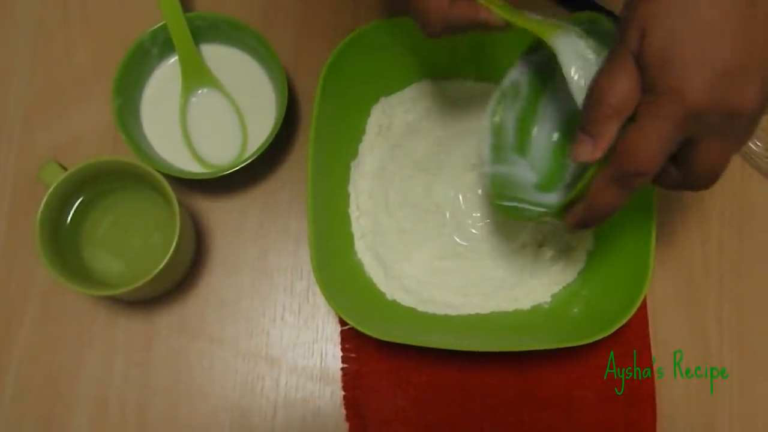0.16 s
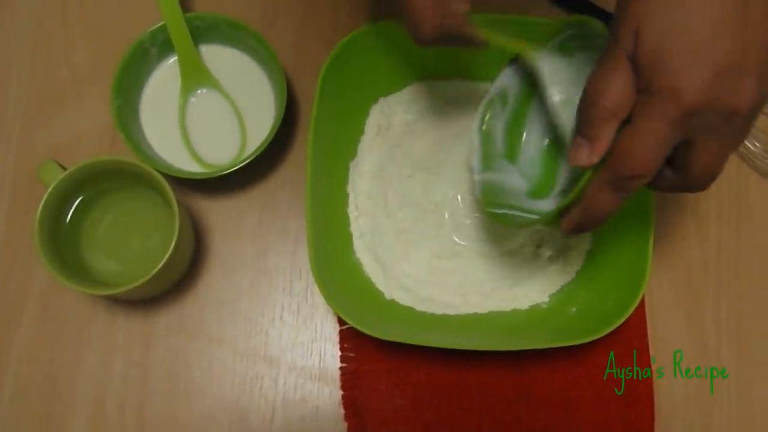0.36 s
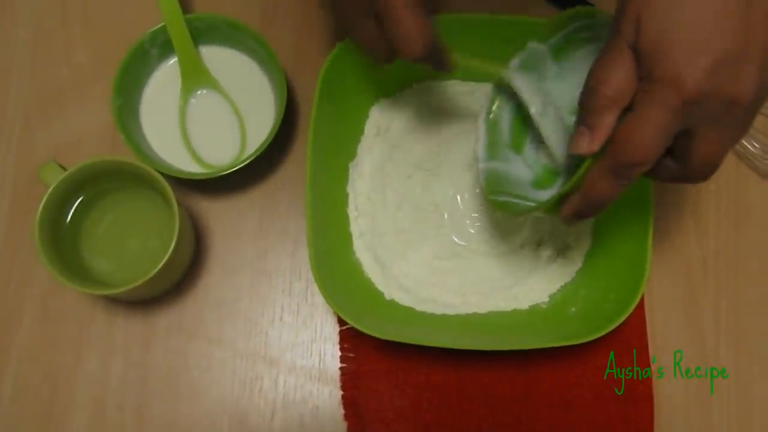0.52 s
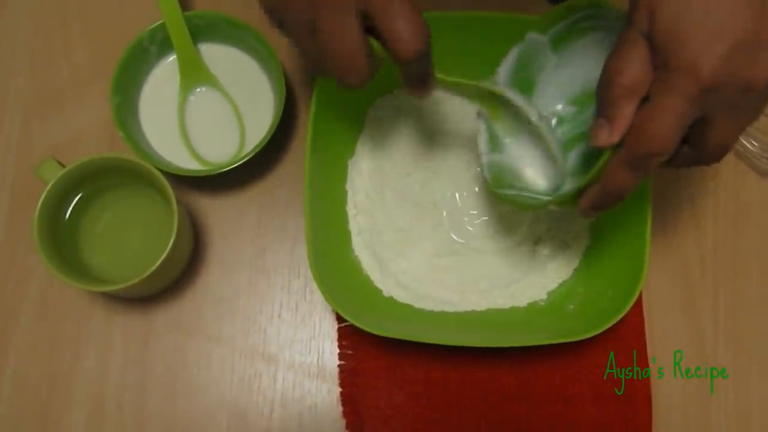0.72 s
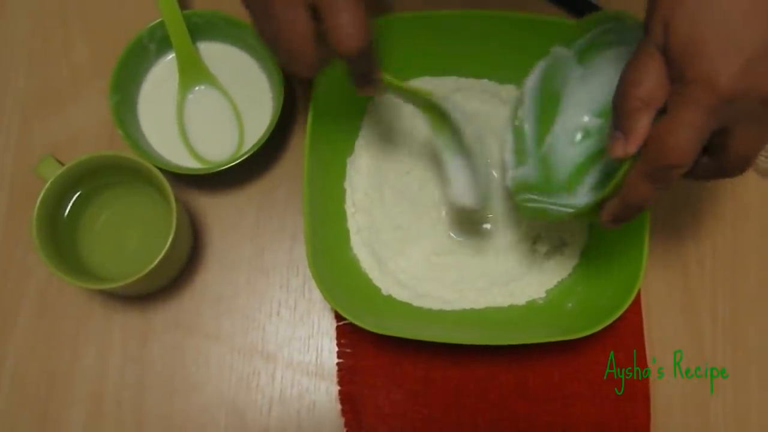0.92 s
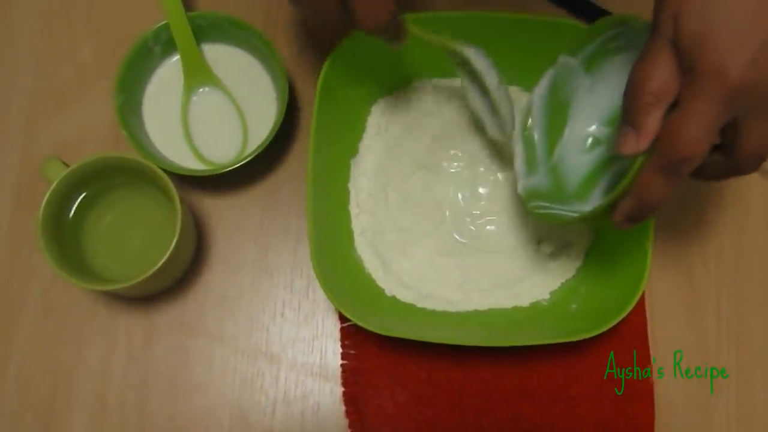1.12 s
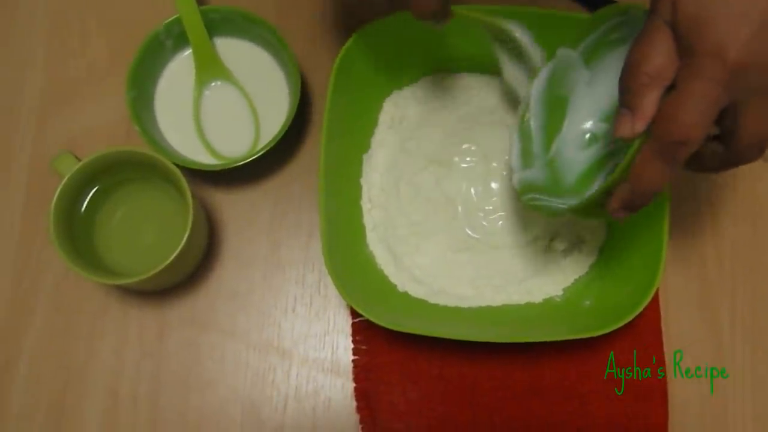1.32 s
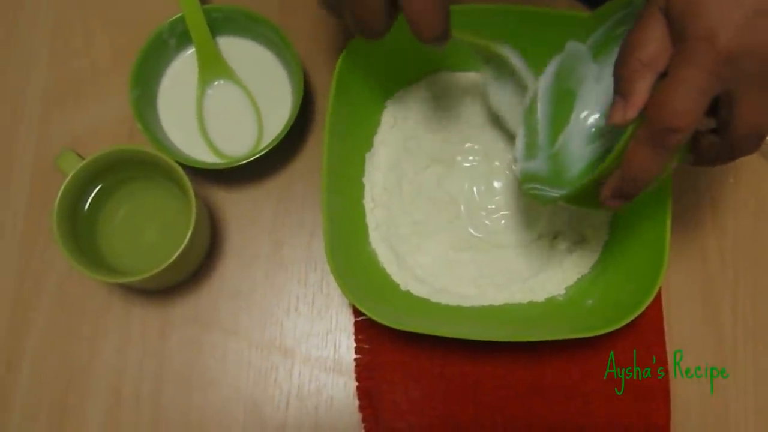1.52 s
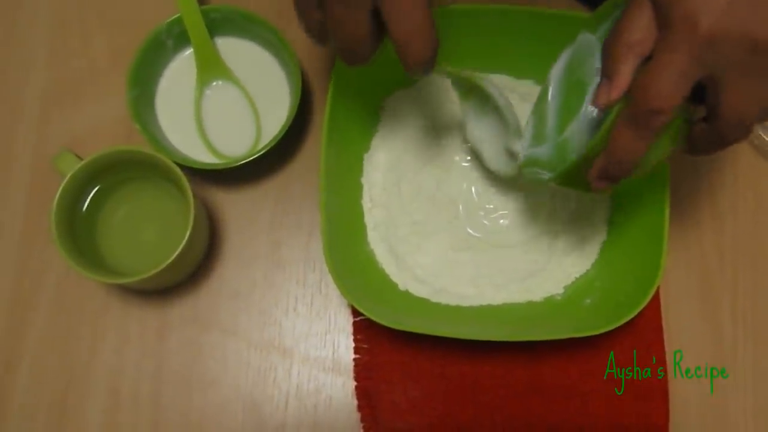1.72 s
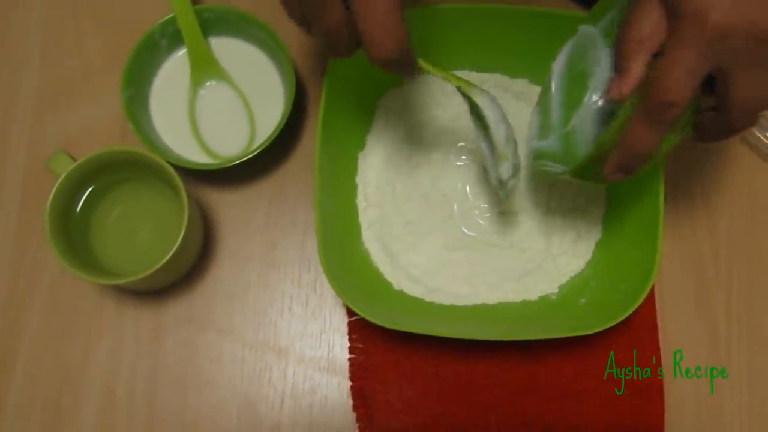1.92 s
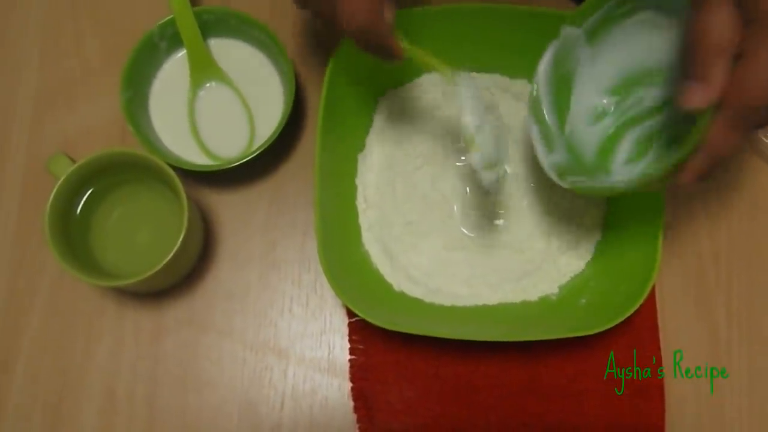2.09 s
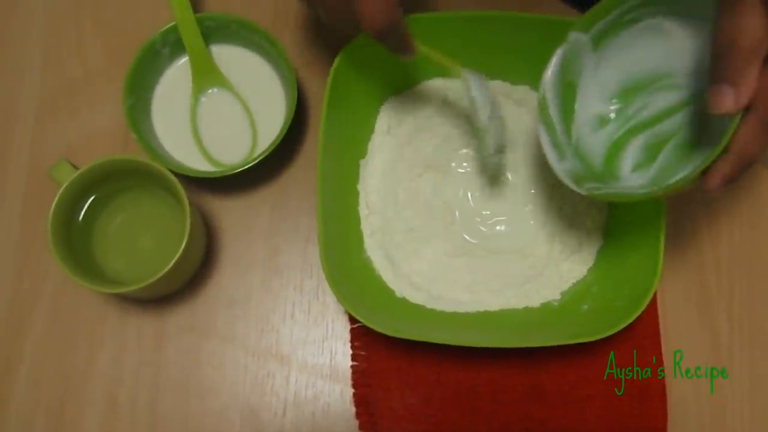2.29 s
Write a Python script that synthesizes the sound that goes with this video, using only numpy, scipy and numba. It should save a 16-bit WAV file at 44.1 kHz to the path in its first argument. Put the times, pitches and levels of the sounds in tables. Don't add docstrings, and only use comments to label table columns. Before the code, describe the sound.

A plastic spoon strikes a small hand-held plastic bowl: a hard, bright clack at 0.2 seconds, a slightly weaker one at 0.4, each with a brief shiver. Dull table thuds follow at 0.5-0.6, small wet plops around 0.84 and 1.15. A soft tap at 1.3 leads into two rough scrapes until 1.7, then a plop at 1.8. Close kitchen; faint motor chatter, thin whine, rumble and hiss throughout.

```python
import sys
import numpy as np
from scipy import signal
from scipy.fft import rfft, irfft
from scipy.io import wavfile
from scipy.ndimage import uniform_filter1d
from numba import njit

SR = 44100
rng = np.random.default_rng(int(sys.argv[2]) if len(sys.argv) > 2 else 0)


def dump_mix(stems):
    frames = np.atleast_2d(stems).T
    limited = np.clip(frames, -1, 1)
    pcm = np.round(limited * 32767).astype(np.int16)
    wavfile.write(sys.argv[1], SR, pcm)


def decibels_to_gain(level_db):
    exponent = np.asarray(level_db, float) / 20
    return 10 ** exponent


N = 103635
T = np.arange(N) / SR
RING = np.arange(SR // 4) / SR

# [f/Hz, density/dB]
HISS = [(100, -3.5), (300, -11), (700, -13.5), (1500, -23), (3200, -20.5), (6500, -20), (11000, -18),
        (16000, -19)]
# [f/Hz, density/dB]
RUMBLE = [(5, 0), (15, 4.5), (32, -4), (45, -9), (62, -7), (90, -39), (150, -25.5), (250, -47)]
HISS_DB, RUMBLE_DB = -47.5, -40.5

# [t/s, level/dB]
TABLE_PUSH = [
    (.44, -67),
    (.5, -40),
    (.55, -39.5),
    (.61, -42),
    (.65, -50.5),
    (.72, -46.5),
    (.84, -47),
    (.9, -65),
]
# [f/Hz, width/Hz, level/dB]
TABLE_MODES = [(48.5, 9.1, 11.5), (156, 34, -1.5), (202, 31, -8), (339, 85, -9.5)]
# [t/s, level/dB, f/Hz, t60/s, rise/s]
THUDS = [
    (.49, -35, 151.2, 0.12, 0.0071),
    (.598, -34, 142.5, 0.19, 0.011),
    (.6, -41.5, 187.6, 0.32, 0.019),
]

# [f/Hz, width/Hz, level/dB]
CASE = [(945, 128, -6), (1532, 210, -6.5), (2085, 160, -2), (2578, 131, -1), (3908, 196, -3.5),
        (4670, 590, -12.5), (5540, 320, -13), (8110, 1500, -16.5)]
# [t/s, level/dB]
MOTOR = [(0, 2.5), (.2, 2), (.55, 2.5), (.62, 0.5), (.75, 2.5), (.9, 5), (1.05, 0), (1.2, 1.5), (1.5, 1),
         (1.8, 3.5), (1.95, 1), (2.19, 3), (2.23, -3), (2.27, 2), (2.35, 0.5)]
CHATTER_PER_S, CHATTER_JITTER, CHATTER_SPREAD_DB = 88, 0.35, 1
CHATTER_DB, GRIND_DB = -53, -48
# [shaft multiple, level/dB]
SIDEBANDS = [(-2, -19), (-1, -13), (0, 0), (1, -6), (2, -12), (4, -19)]
WHINE_HZ, WHINE_DB, SHAFT_HZ, WANDER_HZ = 11361.7, -56.5, 29.8, 3.5
# [t/s, peak/dB]
TICKS = [(0.0272, -32), (0.0857, -29), (0.1244, -28), (0.5282, -42), (0.6293, -30.5), (0.7063, -30),
         (0.7485, -35), (0.7718, -32), (0.7934, -25), (0.839, -28.5), (0.866, -31), (0.9068, -31),
         (0.9698, -28), (0.9822, -26), (1.0156, -28), (1.04, -34), (1.1212, -34), (1.146, -26),
         (1.1534, -39), (1.1815, -29), (1.1927, -40), (1.243, -29), (1.745, -31), (1.8271, -29),
         (1.8564, -27), (1.9175, -27), (1.94, -30.5), (1.976, -36), (2.0013, -32), (2.04, -32),
         (2.0805, -33), (2.102, -33.5), (2.1728, -26), (2.2573, -32), (2.2842, -28), (2.3032, -29)]
TICKS_DB = -55.5

# [t/s, level/dB, f/Hz, t60/s, rise/s]
PLOPS = [(0.25, -36, 2230, 0.02, .002), (1.15, -24.5, 3200, 0.029, 0.0064), (.706, -34, 2000, 0.017, .002),
         (0.48, -36, 1580, 0.019, .001), (1.2, -33, 2650, 0.022, 0.0066), (.838, -36, 7900, .012, .001),
         (.822, -40, 8700, 0.011, 0.00091), (.822, -39, 10300, .008, .001), (.845, -44, 12300, .008, .001),
         (.8375, -33, 950, .02, .002), (.8425, -21, 1000, .02, .004), (.84, -42, 10700, .008, .001),
         (1.7960, -27.5, 1400, .015, .0006), (2, -36, 2500, 0.0076, 0.00023),
         (1.799, -33, 840, 0.023, .001), (1.796, -32, 1730, .012, .0006), (1.9, -43, 2100, 0.0083, .001),
         (1.2, -31, 5500, .0012, 0.000047), (0.74, -33, 3500, 0.0035, .0001), (1.92, -38, 203, 0.042, .01)]
PLOP_ROOM_DB = -12

# [t/s, pressure/dB, treble from speed/dB]
SLIDE = [
    (.3, -62, 17),
    (.35, -54.5, 15),
    (.38, -52.5, 18),
    (.398, -52, 16),
    (.405, -70, 0),
]
STROKE_1 = [
    (1.325, -37.5, -7),
    (1.35, -45, -4),
    (1.378, -43, 2),
    (1.386, -34, -7),
    (1.435, -35, 0.5),
    (1.46, -36, -1),
    (1.472, -39, -8),
    (1.49, -44, -3),
    (1.532, -44, 2.5),
]
STROKE_2 = [
    (1.53, -55, 15),
    (1.56, -40.5, 4.5),
    (1.59, -32.5, 0),
    (1.63, -33, 5.5),
    (1.665, -31.5, -1),
    (1.698, -35.5, -2),
    (1.708, -53, -3),
    (1.8, -41, -10),
    (1.84, -68, -13),
]
# [f/Hz, width/Hz, level/dB]
WALL_1 = [(390, 77, -10.5), (698, 84, -7.5), (945, 157, -6), (1503, 83, 0.5), (2650, 290, -13.5),
          (3810, 330, -15.5), (5360, 380, -14.5), (6870, 630, -17), (8140, 420, -14.5), (10100, 2900, -31)]
WALL_2 = [(378, 67, -12), (591, 104, -5.5), (833, 88, 2), (1147, 67, 2), (1370, 164, -2.5), (1780, 430, -6),
          (2475, 63, -6), (3620, 610, -12), (5520, 1200, -17), (7160, 320, -15.5), (8090, 230, -12.5),
          (9900, 2000, -21.5), (12700, 2000, -26.5)]
# [t/s, f/Hz]
HOLLOW = [
    (1.55, 1750),
    (1.6, 1560),
    (1.635, 1450),
    (1.665, 1300),
    (1.7, 1150),
]
HOLLOW_WIDTH_HZ, HOLLOW_DB = 265.0, -1
SLIPS_PER_S, SLIP_SPREAD_DB = 3500, 2.5
TREBLE_HZ = 2250

# [t/s, peak/dB, bounce delay/s, bounce/dB, crack/dB]
TAPS = [
    (.2171, -3.5, 0.00084, -40, -14),
    (.4000, -7.5, 0.00075, -35, -14),
    (1.3122, -17, 0.00087, -25, -13.5),
]
# [f/Hz, level/dB, t60/s]
GRIP_1 = [(668, -12, 0.049), (1115, 7.5, 0.02), (1327, 5, 0.015), (1995, -15.5, 0.037), (2700, 3.5, 0.014),
          (2950, 1.5, 0.014), (4735, 7.5, 0.011), (5030, 11.5, 0.006), (6150, 3, 0.0099), (7020, -1, 0.011),
          (8740, -6, 0.009), (9530, -19, .012), (11300, -19, 0.0077)]
GRIP_2 = [(590, -11, 0.0049), (1164, -1.5, 0.016), (1660, 4, 0.0087), (1840, -7, 0.0072),
          (2817, 0.5, 0.012), (3510, -3, 0.0082), (4580, 1.5, 0.0095), (5530, -11.5, 0.017),
          (6900, -20, 0.012), (7420, -10.5, 0.012), (8320, -12.5, 0.013), (9706, -22, .01),
          (11300, -32, .006)]
GRIP_3 = [(510, -24, .015), (1050, 7.5, 0.0052), (1450, 6.5, 0.008), (1600, -23, 0.012), (2560, -7, 0.013),
          (3620, -5.5, 0.012), (4180, -2.5, 0.0081), (5370, 1, 0.0047), (6500, -5.5, 0.0092),
          (6950, -3, 0.0073), (8110, -7.5, 0.015), (9700, -9.5, 0.0096), (11900, -3, 0.0052)]
CRACK_T60_S, RUSTLE_DB, RUSTLE_T60_S = 0.016, -17, 0.13
SCATTER_RING = 0.45
# [f/Hz, width/Hz, level/dB]
SHAKE_1 = [(595, 83, 7), (1150, 320, -17), (2060, 100, -8), (2620, 190, 3), (2920, 250, 0.5),
           (3420, 130, -12), (4550, 170, -4), (5140, 400, -2), (7170, 700, -10.5)]
SHAKE_2 = [(915, 71, -5), (1700, 170, 4), (1970, 200, 1.5), (2780, 240, -1.5), (3950, 500, -10),
           (4640, 300, -6.5), (5440, 500, -11), (7000, 430, -16), (8200, 340, -10)]
SHAKE_3 = [(1010, 89, 6), (1430, 140, 4), (2520, 240, -4), (3870, 330, -9), (5470, 500, -27),
           (7000, 500, -20)]
# [level/dB, t60/s]
SHAKES = [
    (-27.5, 0.27),
    (-27, 0.25),
    (-29.5, 0.15),
]

# [f/Hz, t60/s, level/dB]
KITCHEN = [(303, 1, -26), (553, 0.54, -19.5), (1300, 0.14, -20.5), (2760, 0.59, -16), (5000, 0.42, -27),
           (9600, 0.36, -18)]
EARLY_DB, EARLY_T60_S, PREDELAY_S = 6.5, 0.07, 0.0039

KNEE, HEADROOM = 0.8, 0.17
TOP_HZ = 15720


def level(x, db):
    return x * decibels_to_gain(db) / np.sqrt(np.mean(x ** 2))


def add(out, start, x):
    i = int(start * SR)
    out[i:i + len(x)] += x


def fade(t, t60):
    return np.exp(-np.log(1000) * t / t60)


def band(x, hz, width):
    return signal.lfilter(*signal.iirpeak(hz, hz / width, SR), x)


def body(x, peaks):
    return sum((-1) ** k * decibels_to_gain(db) * band(x, f, w) for k, (f, w, db) in enumerate(peaks))


@njit
def sweep(x, hz, width):
    y, b, l = np.empty(len(x)), 0., 0.
    for i in range(len(x)):
        g, k = np.tan(np.pi * hz[i] / SR), width / hz[i]
        v = (b + g * (x[i] - l)) / (1 + g * (g + k))
        b, l, y[i] = 2 * v - b, l + 2 * g * v, k * v
    return y


def coloured(points):
    f, db = np.transpose(points)
    hz = np.fft.rfftfreq(N, 1 / SR) + 1
    gain = decibels_to_gain(np.interp(np.log(hz), np.log(f), db))
    return irfft(rfft(rng.standard_normal(N)) * gain, N)


def walk(rate):
    k = int(SR / rate)
    held = np.repeat(rng.standard_normal(N // k + 1), k)
    return 0.72 * uniform_filter1d(uniform_filter1d(held, k), k)[:N]


def curve(rows, order=1):
    r = np.array(rows)
    return decibels_to_gain(np.interp(T, r[:, 0], r[:, order], left=-120, right=-120))


def ring(hz, t60, rise, late=0.):
    t = np.maximum(RING - late, 0)
    return (1 - np.exp(-t / rise)) * fade(t, t60) * np.sin(2 * np.pi * hz * t)


def knocks(rows):
    out = np.zeros(N)
    for s, db, f, t60, rise in rows:
        add(out, s, decibels_to_gain(db + 5.0) * ring(f, t60, rise))
    return out


def floor():
    hiss = level(coloured(HISS), HISS_DB)
    return hiss + level(coloured(RUMBLE) * decibels_to_gain(0.5 * walk(5.6)), RUMBLE_DB)


def table():
    friction = rng.standard_normal(N) * decibels_to_gain(3.1 * walk(38.8))
    return level(body(friction, TABLE_MODES), 0) * curve(TABLE_PUSH) + knocks(THUDS)


def motor():
    chance = rng.standard_normal((400, 2))
    at = np.cumsum(np.exp(CHATTER_JITTER * chance[:, 0]) * SR / CHATTER_PER_S).astype(int)
    teeth = np.zeros(N)
    teeth[at[at < N]] = decibels_to_gain(CHATTER_SPREAD_DB * chance[at < N, 1])
    decay = np.exp(-1 / (0.00026 * SR))
    burst = signal.lfilter([1], [1, -decay], teeth) * rng.standard_normal(N)
    grind = rng.standard_normal(N) * decibels_to_gain(3.53 * walk(90))
    return (level(body(burst, CASE), CHATTER_DB) + level(body(grind, CASE), GRIND_DB)) * curve(MOTOR)


def whine():
    turn = np.cumsum(WHINE_HZ + WANDER_HZ * walk(13.2)) / SR
    tones = [decibels_to_gain(db) * np.sin(2 * np.pi * (turn + k * SHAFT_HZ * T) + k * k) for k, db in SIDEBANDS]
    return level(sum(tones), WHINE_DB)


def ticks():
    out, t = np.zeros(N), RING[:400]
    for s, db in TICKS:
        add(out, s, decibels_to_gain(db) * rng.standard_normal(400) * t * np.exp(-t / .001))
    return level(body(band(out, 2600, 3500), CASE), TICKS_DB)


def scrapes():
    out = np.zeros(N)
    n = SR // 2
    for wall, rows in ((WALL_1, STROKE_1), (WALL_2, STROKE_2), (WALL_2, SLIDE)):
        a = int(rows[0][0] * SR)
        sizes = decibels_to_gain(SLIP_SPREAD_DB * np.minimum(rng.exponential(size=n), 4.))
        slips = (rng.random(n) < SLIPS_PER_S / SR) * sizes * rng.choice([-1, 1], n)
        slips = slips * decibels_to_gain(1.8 * walk(150)[:n])
        low = body(slips, [p for p in wall if p[0] < TREBLE_HZ])
        if rows is STROKE_2:
            hollow_hz = np.interp(T[a:a + n], *np.array(HOLLOW).T)
            low = low + decibels_to_gain(HOLLOW_DB) * sweep(slips, hollow_hz, HOLLOW_WIDTH_HZ)
        high = body(slips, [p for p in wall if p[0] >= TREBLE_HZ])
        pressure, speed = curve(rows)[a:a + n], curve(rows, order=2)[a:a + n]
        add(out, a / SR + 1e-6, pressure * (low + speed * high) / low.std())
    return out


def shakes():
    out = np.zeros(N)
    for tap, (db, t60), peaks in zip(TAPS, SHAKES, (SHAKE_1, SHAKE_2, SHAKE_3)):
        rattle = band(rng.standard_normal(len(RING)), 2760, 5400)
        shiver = level(body(rattle, peaks), db)
        add(out, tap[0], shiver * np.minimum(RING / 0.0083, 1) * fade(RING, t60))
    return out


def taps():
    out, off = np.zeros(N), np.zeros(N)
    for (s, db, lag, bounce_db, crack_db), modes in zip(TAPS, (GRIP_1, GRIP_2, GRIP_3)):
        blow = sum(decibels_to_gain(g) * ring(f, t60, 0.00061) for f, g, t60 in modes)
        bounce = sum(decibels_to_gain(g) * ring(f, t60, 0.00062, lag) for f, g, t60 in modes)
        hit = blow - decibels_to_gain(bounce_db) * bounce
        wide = sum(decibels_to_gain(g) * ring(f, SCATTER_RING * t60, 0.00061) for f, g, t60 in modes)
        dying = fade(RING, CRACK_T60_S) + decibels_to_gain(RUSTLE_DB) * fade(RING, RUSTLE_T60_S)
        crack = band(rng.standard_normal(len(RING)), 5300, 5100) * dying
        peak = np.abs(hit).max()
        add(out, s, decibels_to_gain(db + 6.5) * (hit / peak + decibels_to_gain(crack_db) * crack))
        add(off, s, decibels_to_gain(db + 7) * wide / peak)
    return out, off


def kitchen(x):
    t = T[:SR // 2]
    tail = np.zeros(len(t))
    for f, t60, db in KITCHEN:
        decay = fade(t, t60) + decibels_to_gain(EARLY_DB) * fade(t, EARLY_T60_S)
        noise = band(rng.standard_normal(len(t)), f, 0.67 * f)
        tail += decibels_to_gain(db - 32.0) * noise * decay / np.sqrt(f / 1000) * 4
    return signal.fftconvolve(x, tail * np.clip(t / PREDELAY_S - .5, 0, 1))[:N]


def scene():
    blows, scattered = taps()
    scraped, plops = scrapes(), knocks(PLOPS)
    bowl = blows + shakes() + scraped
    room = kitchen(scattered + scraped + decibels_to_gain(PLOP_ROOM_DB) * plops)
    camera = motor() + whine() + ticks()
    return (bowl + plops + room + table() + camera + floor())[None]


def top_cut(x):
    return signal.sosfilt(signal.butter(12, 16480, fs=SR, output="sos"), x)


def record(dry):
    over = np.maximum(np.abs(dry) - KNEE, 0)
    soft = dry - np.sign(dry) * (over - HEADROOM * np.tanh(over / HEADROOM))
    cut = signal.ellip(16, .3, 58, TOP_HZ, fs=SR, output="sos")
    return top_cut(signal.sosfilt(cut, soft))


dry = scene()
out = record(dry)
dump_mix(out)
```